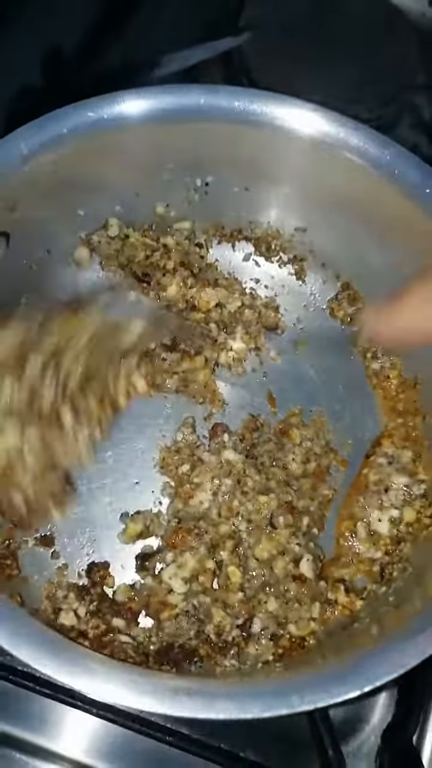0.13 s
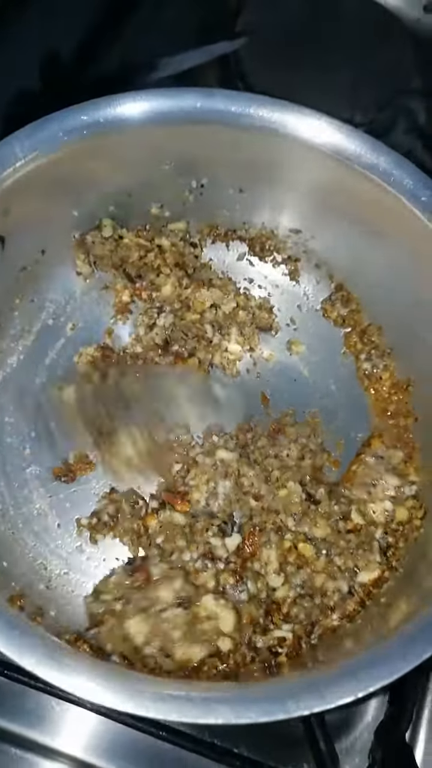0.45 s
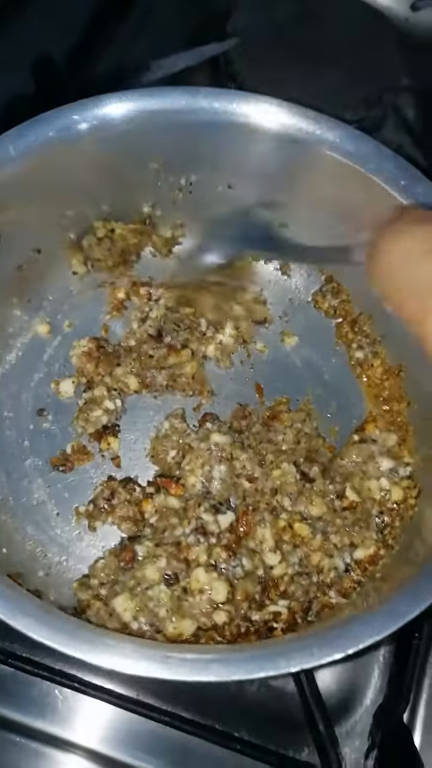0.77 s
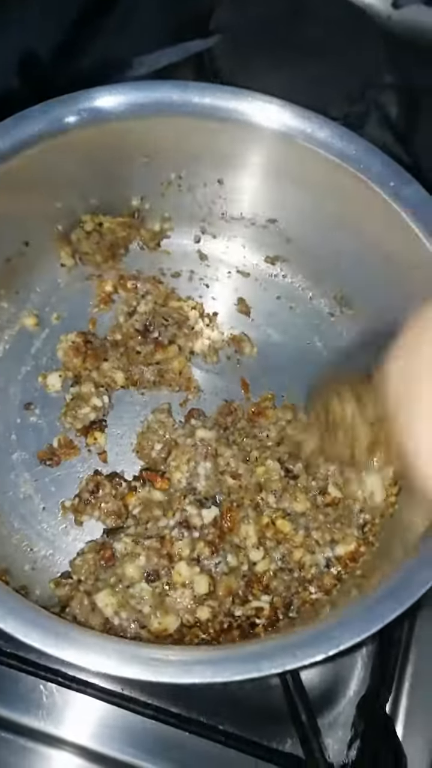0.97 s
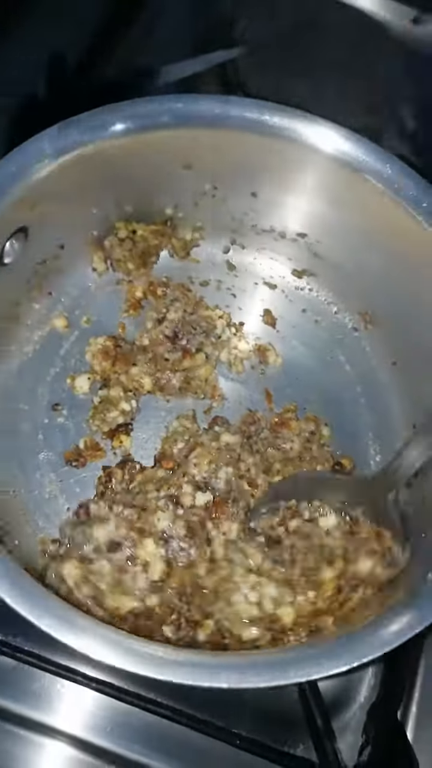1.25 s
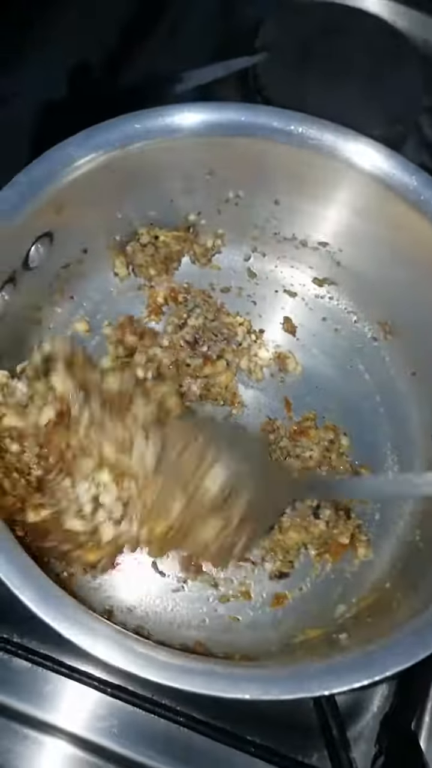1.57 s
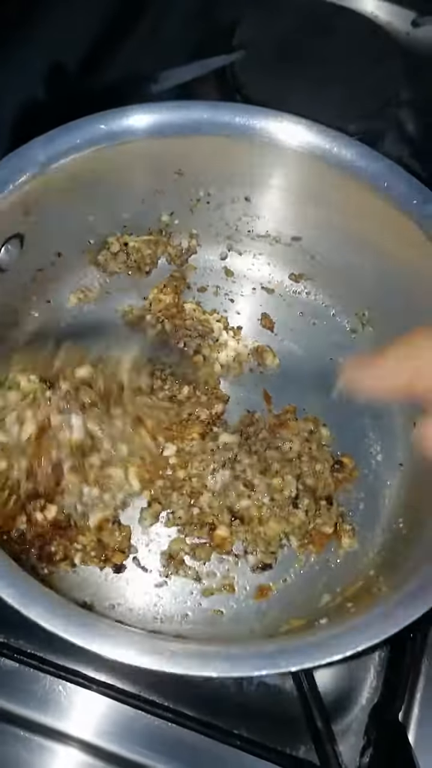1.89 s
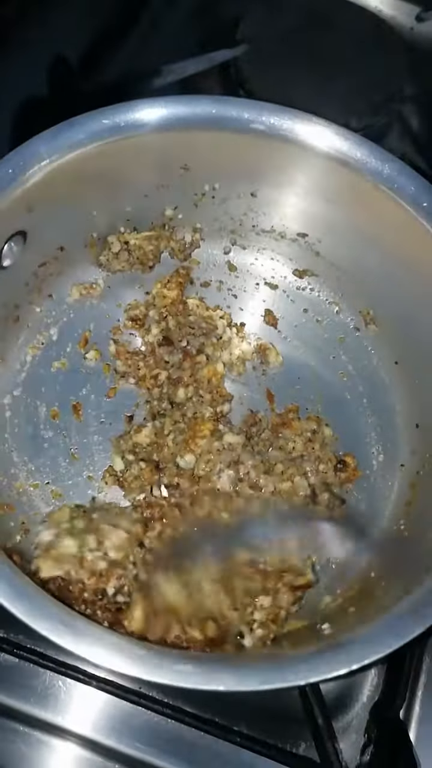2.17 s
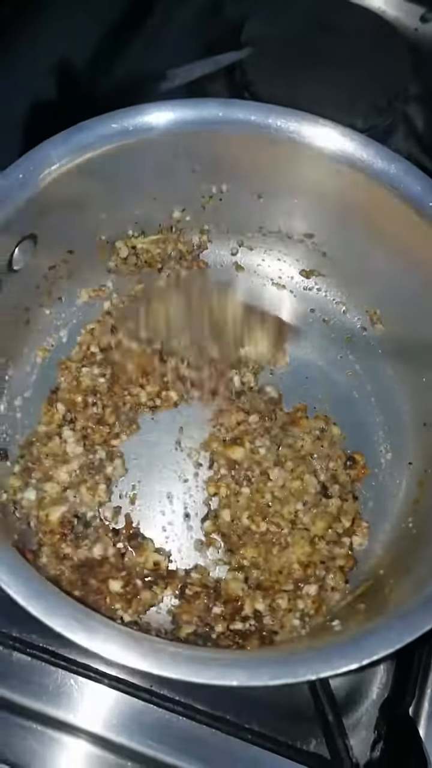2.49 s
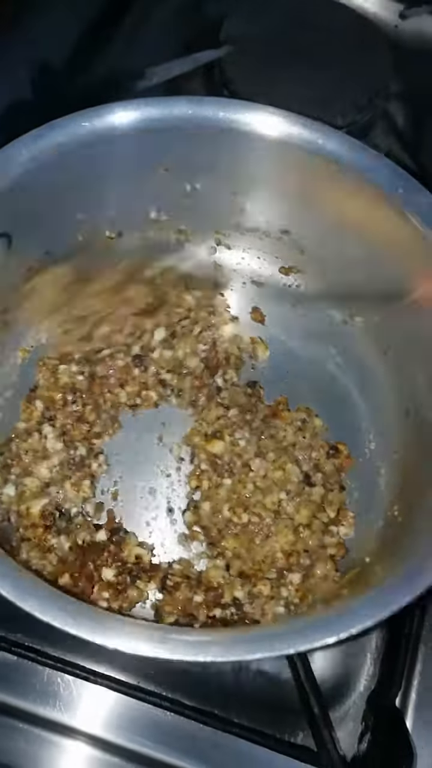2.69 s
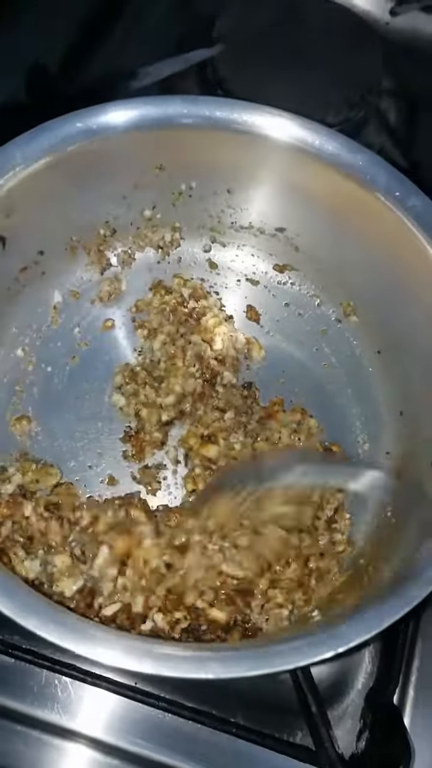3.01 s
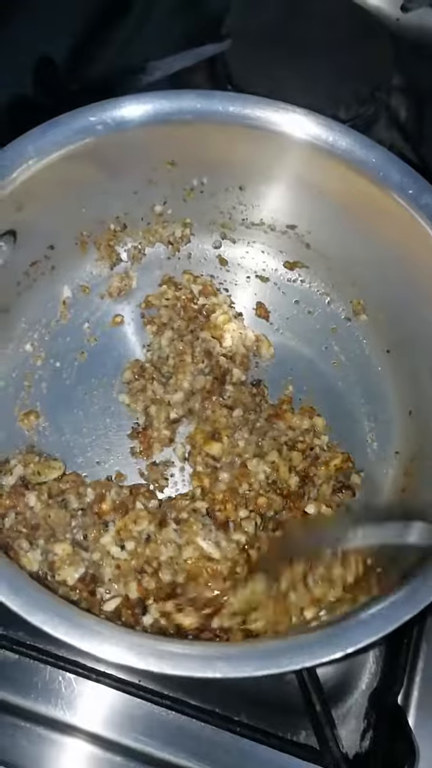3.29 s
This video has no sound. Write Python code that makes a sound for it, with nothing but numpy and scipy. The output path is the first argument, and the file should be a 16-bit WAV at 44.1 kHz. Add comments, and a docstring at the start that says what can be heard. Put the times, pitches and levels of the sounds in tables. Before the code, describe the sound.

Steel spoon stirring gritty food in a metal pan, sharp knocks and short squeaky scrapes, close up

```python
"""A steel spoon stirs crumbly food in a steel pan on a gas stove, close to two microphones.
Strokes: stick-slip partials squeak, filtered grit grates and excites pan modes; one ends in a bright rasp.
Knocks: ticks and noise cracks, ringing modes, grainy rattle, low shudder of the stand.
Burner: coloured noise hisses and rumbles, a narrow noise band hums. One low-passed gust touches the microphones."""
import sys
import numpy as np
from scipy import signal
from scipy.fft import rfft, irfft
from scipy.io import wavfile
from scipy.ndimage import uniform_filter1d

SR = 44100
rng = np.random.default_rng(int(sys.argv[2]) if len(sys.argv) > 2 else 0)


def dump(signal):
    """Clip the signal to [-1, 1] and save it as 16-bit WAV at the path in sys.argv[1]."""
    limited = np.clip(np.atleast_2d(signal).T, -1, 1)
    pcm = np.round(limited * 32767).astype(np.int16)
    wavfile.write(sys.argv[1], SR, pcm)


N = 152145
T = np.arange(N) / SR
F = np.fft.rfftfreq(N, 1 / SR) + 1  # offset 1 Hz keeps log(F) finite


def undb(db):
    """Decibels to gain."""
    return 10 ** (np.asarray(db) / 20)


def unit(x):
    """Scale to rms 1."""
    return x / np.sqrt(np.mean(x ** 2))


def colour(x, table):
    """Filter by (f/Hz, level/dB) points, interpolated over log f."""
    hz, db = np.array(table, float).T
    gain = undb(np.interp(np.log(F), np.log(hz), db))
    return irfft(rfft(x) * gain, N)


def band(x, hz, width_hz):
    """Two-pole resonance, gain 1 at the centre."""
    return signal.lfilter(*signal.iirpeak(hz, hz / width_hz, SR), x)


def band_twice(x, hz):
    """Two cascaded resonances, each as wide as its centre frequency."""
    return band(band(x, hz, hz), hz, hz)


def swell(start_s, rise_s, t60_s):
    """Exponential rise (time constant rise_s) times exponential fall."""
    t = np.maximum(T - start_s, 0)
    return (1 - np.exp(-t / rise_s)) * np.exp(-np.log(1000) * t / t60_s)


def grains(per_s, scatter_db):
    """Random clicks of uneven size, rms 1."""
    hits = rng.random(N) < per_s / SR
    sizes = rng.standard_normal(N) * undb(scatter_db * rng.exponential(size=N))
    return unit(hits * sizes)


def apart(draw):
    """Left and right share part of a random sound."""
    both, left, right = draw(), draw(), draw()
    return (both + 1.78 * np.array([left, right])) / np.sqrt(1.5)


def walk(per_s):
    """Random wander: noise averaged twice over 1 / per_s, rms 1."""
    k = int(SR / per_s)
    return unit(uniform_filter1d(uniform_filter1d(rng.standard_normal(N), k), k))


def ring(x, hz, t60_s):
    """One decaying pan mode; an impulse of 1 rings with amplitude 1."""
    pole = np.exp(2j * np.pi * hz / SR - np.log(1000) / (t60_s * SR))
    return signal.lfilter([1], [1, -pole], x).imag


def panned(x, left_minus_right_db):
    """Spread over left and right."""
    return x * undb(np.array([[left_minus_right_db], [-left_minus_right_db]]) / 2)


GRIT_PER_S, GRIT_SCATTER_DB = 6000, 1.5


def grit():
    """Dense random grains, partly shared by left and right."""
    return apart(lambda: grains(GRIT_PER_S, GRIT_SCATTER_DB))


GRIP_S, LIFT_T60_S = .002, .06  # force: rise time constant, release
SLIP_JITTER, OVERTONE_FLICKER_DB, SMEAR_PER_S = .015, 2.5, 350
ROUGH, FIRM_DB, ROUGH_PER_DB = .12, -37, .05  # squeaks below FIRM_DB are rougher
SQUEAK_PAN_DB, GRATE_FLICKER_DB = 11.5, 2
SINGS_FROM_HZ, SINGS_BELOW_HZ, SING_FLICKER_DB, GRIT_T60_S = 1500, 4700, 6.6, .022
# spoon strokes: t/s, length/s, squeak level/dB, start f/Hz, end f/Hz, overtones/dB re squeak,
# grating level/dB, pan singing level/dB, swell over the stroke/dB
STROKES = [(0, 0.13, -58, 736, 873, -16, -52.5, -55, -13.5),
           (0.075, 0.017, -33.5, 852, 845, -6.5, -51.5, -56, -9.5),
           (0.631, .038, -44, 1210, 1158, 8, -47, -45, 7),
           (0.706, 0.072, -37, 962, 727.4, 6, -42.5, -41.5, -1),
           (0.814, 0.033, -41, 758, 700, 4, -42, -58, -5),
           (0.862, 0.056, -43, 609, 625, -5, -43.5, -58, -7.5),
           (0.917, 0.03, -41, 762, 817, -5, -54.5, -53, 0.5),
           (0.955, 0.024, -40.5, 766, 723, -12, -48, -72, 0),
           (1.074, 0.062, -54, 738, 800, -16, -66, -66, 10),
           (1.211, 0.039, -55, 771, 820, -6, -62, -66.5, 16),
           (1.275, .11, -57.5, 830, 1040, -12, -63, -62, -5),
           (2.193, 0.019, -34, 902, 870, -8, -44, -49, 4.5),
           (2.216, 0.056, -36, 789, 809, -3.5, -39.5, -41.5, -6),
           (2.281, .035, -38.5, 908, 907, 9, -37, -41.5, -0.5),
           (2.601, .11, -39, 945, 863, -9, -40, -45.5, 3),
           (3.24, 0.075, -41.5, 846, 880, -13, -44.5, -49, -2),
           (3.297, .058, -41.5, 900.4, 965, 7.5, -40, -45, 1.5)]
# squeak partial colour: f/Hz, level/dB
SQUEAK_COLOUR = [(1200, 5), (1520, -8.5), (1950, -16), (2800, -16)]
# grating colour: f/Hz, level/dB
GRATING_COLOUR = [(710, 17.5), (1200, 6.5), (1870, 4), (3870, 1.5), (5180, 1), (7910, 2.5), (14800, -20.5)]
# pan modes, also rung by knocks: f/Hz, level/dB, t60/s
PAN_MODES = [(590, -10, .2), (717, 0, .08), (930, 0, .07), (1180, -7, .08), (1960, -3, .3), (2130, -4, .06),
             (2400, -3, .08), (3354, -8, .4), (3800, -2, .06), (4360, -4, .45), (5256, -1, .18),
             (5830, -6, .06), (6590, -4, .13), (7375, -4, .1), (8150, -3, .12), (9560, -8, .1)]


def strokes():
    """Stick-slip squeak of the spoon edge, partly smeared, and grit that grates and rings the pan."""
    wobble = 1 + SLIP_JITTER * walk(160)
    flickers = [undb(OVERTONE_FLICKER_DB * walk(26) * (k > 0)) for k in range(3)]
    smears = [walk(SMEAR_PER_S) for _ in range(3)]
    squeak, push, sing = np.zeros((3, N))
    colour_hz, colour_db = np.array(SQUEAK_COLOUR).T
    for s, length, db, from_hz, to_hz, over_db, grate_db, sing_db, swell_db in STROKES:
        part = slice(int(s * SR), min(int((s + length + .15) * SR), N))
        t = T[part] - s
        along = np.clip(t / length, 0, 1)
        lift_db = -60 * np.maximum(t - length, 0) / LIFT_T60_S
        force = (1 - np.exp(-t / GRIP_S)) * undb(swell_db * (along - .5) + lift_db)
        hz = (from_hz + (to_hz - from_hz) * np.sqrt(along)) * wobble[part]
        phase = 2 * np.pi * np.cumsum(hz) / SR
        rough = np.clip(ROUGH + ROUGH_PER_DB * max(FIRM_DB - db, 0), 0, 1)
        for k, (flicker, smear) in enumerate(zip(flickers, smears)):
            partial_db = db + over_db * (k > 0) + np.interp((k + 1) * hz, colour_hz, colour_db)
            steadiness = np.sqrt(1 - rough) + np.sqrt(rough) * smear[part]
            partial = np.sqrt(2) * np.sin((k + 1) * phase)
            squeak[part] += force * undb(partial_db) * flicker[part] * steadiness * partial
        push[part] += undb(grate_db) * force
        sing[part] += undb(sing_db) * force
    grains_lr = grit()
    modes = 0
    for hz, db, _ in PAN_MODES:
        if SINGS_FROM_HZ < hz < SINGS_BELOW_HZ:
            modes = modes + undb(db + SING_FLICKER_DB * walk(67)) * unit(ring(grains_lr, hz, GRIT_T60_S))
    grate = unit(colour(grains_lr, [(600, -66), *GRATING_COLOUR]))
    grating = undb(GRATE_FLICKER_DB * walk(46)) * push * grate
    return panned(squeak, SQUEAK_PAN_DB) + grating + sing * unit(modes)


BURNER_DB, RUMBLE_FLICKER_DB, FLICKER_DB, ALIKE_BELOW_HZ = -51, 3, .6, 290
HUM_HZ, HUM_DB, HUM_WIDTH_HZ = 281.2, -62, 3.3
# burner noise colour: f/Hz, level/dB
BURNER_COLOUR = [(27, -2), (54, -1), (151, -6), (293, -12), (665, -22), (1040, -12.5), (1480, -23),
                 (2000, -15), (2300, -26.5), (4400, -24.5), (6000, -29), (8000, -21.5), (10000, -29.5),
                 (14400, -33.5), (16000, -55)]
# edges of the separately flickering bands: f/Hz
FLICKER_EDGES_HZ = [0, 60, 500, 3000, 22050]


def burner():
    """Gas hiss over a fluttering rumble, alike left and right only in the bass, and a faint wavering hum."""
    mid, side = (rfft(colour(rng.standard_normal(N), BURNER_COLOUR)) for _ in range(2))
    wide = 1 / (1 + (ALIKE_BELOW_HZ / F) ** 2)
    pair = np.array([mid + wide * side, mid - wide * side]) / np.sqrt(1 + wide ** 2)
    flickers = [(RUMBLE_FLICKER_DB, 6), (RUMBLE_FLICKER_DB, 12), (FLICKER_DB, 20), (FLICKER_DB, 25)]  # dB, 1/s
    gas = 0
    for lo, hi, (db, per_s) in zip(FLICKER_EDGES_HZ, FLICKER_EDGES_HZ[1:], flickers):
        gas = gas + undb(db * walk(per_s)) * irfft(pair * ((F >= lo) & (F < hi)), N)
    hum = unit(band(rng.standard_normal(N), HUM_HZ, HUM_WIDTH_HZ))
    return undb(BURNER_DB) * unit(gas) + undb(HUM_DB) * hum


CRACK_RISE_S, CRACK_T60_S, TICK_DB = 0.001, 0.02, -3
THUD_RISE_S, THUD_T60_S, THUD_DB = 0.018, 0.32, 3
RATTLE_PER_S, RATTLE_SCATTER_DB, RATTLE_TILT_DB_PER_OCTAVE = 3000, 1.5, -5
RATTLE_RISE_S, RATTLE_T60_S = .002, 0.29
CLANK_DB, CLANK_T60_S = 19, .036  # louder first moments of the modes
RING_SCATTER_DB, CONTACT_S, RING_BEAT = 2.5, .003, .9  # modes join in over the contact
# knocks: t/s, level/dB, then re level/dB: thud, low, middle, treble, rattle, ring
KNOCKS = [(0.161, -14.5, -16, -2.5, -1.5, -10.5, -15.5, -28.5),
          (0.526, -39.5, -2, 3.5, -45, -20, -10, -11.5), (0.642, -20.5, -22.5, -6, -49, -35, -13.5, -48),
          (0.786, -8, -26.5, -7, -8.5, -5, -19, -35.5), (0.799, -15.5, -28.5, -8, 1, -0.5, -21, -30),
          (1.7198, -13.5, -26.5, 5, -6, -34, -18.5, -37), (1.757, -27.5, -9, -18, -11, -14.5, -8, -20.5),
          (1.902, -11, -19.5, -7, -8, -11.5, -18, -28), (2.559, -9, -28, 3, -6.5, -7.5, -20, -32.5),
          (2.611, -22.5, -17.5, 0.5, -42, -5, -13, -32), (2.722, -19, -15, -12, 2.5, -3, -11, -27.5),
          (3.0365, -8, -32, -30, -6.5, -2.5, -27, -28), (3.19, -26.5, -16.5, -1, 2.5, 1, -17, -33.5)]
# centres of low, middle, treble: f/Hz
BANDS_HZ = [904, 2087, 6400]
# stand shudder colour: f/Hz, level/dB
THUD_COLOUR = [(40, -10), (146, 1.5), (281, 0.5), (600, -21), (900, -106)]


def knocks():
    """Each blow: a tick and short crack, ringing modes, a grainy rattle; the stand's shudder apart."""
    noise = rng.standard_normal(N)
    rattle = apart(lambda: grains(RATTLE_PER_S, RATTLE_SCATTER_DB))
    cracks = [unit(band_twice(noise, f)) for f in BANDS_HZ]
    tilts_db = [RATTLE_TILT_DB_PER_OCTAVE * np.log2(f / BANDS_HZ[0]) for f in BANDS_HZ]
    tails = sum(unit(band_twice(rattle, f)) * undb(d) for f, d in zip(BANDS_HZ, tilts_db))
    thud = unit(colour(rng.standard_normal(N), THUD_COLOUR))
    modes = np.arange(len(PAN_MODES))
    log_mode_hz = np.log(np.array(PAN_MODES)[:, 0])
    out, shudder = np.zeros((2, N)), np.zeros(N)
    blows, ticks = np.zeros((len(PAN_MODES), N)), np.zeros((len(BANDS_HZ), N))
    for s, db, thud_db, *tone, rattle_db, ring_db in KNOCKS:
        crack = sum(undb(db + d) * c for d, c in zip(tone, cracks))
        out += crack * swell(s, CRACK_RISE_S, CRACK_T60_S)
        out += undb(db + rattle_db) * tails * swell(s, RATTLE_RISE_S, RATTLE_T60_S)
        shudder += undb(db + thud_db + THUD_DB) * thud * swell(s, THUD_RISE_S, THUD_T60_S)
        scatter_db = RING_SCATTER_DB * rng.standard_normal(len(modes))
        late_s = CONTACT_S * rng.random(len(modes))
        tone_db = np.interp(log_mode_hz, np.log(BANDS_HZ), tone)
        blows[modes, ((s + late_s) * SR).astype(int)] = undb(db + ring_db + scatter_db + tone_db)
        ticks[:, int(s * SR)] = undb(db + TICK_DB + np.array(tone))
    out += sum(band_twice(x, f) * SR / f / 2 for x, f in zip(ticks, BANDS_HZ))  # offsets 1/bandwidth
    for blow, (hz, db, t60_s) in zip(blows, PAN_MODES):
        beat = 1 + RING_BEAT * np.array([walk(77), walk(180)])
        clank = undb(CLANK_DB) * ring(blow, hz, CLANK_T60_S)
        out += undb(db) * (ring(blow, hz, t60_s) * beat + clank)
    return out, shudder


RASP_S, RASP_DB, RASP_RISE_S, RASP_T60_S, RASP_HZ = 0.93, -35, .015, .12, 6330


def rasp():
    """A brief bright rasp of band-passed grit as one stroke ends."""
    half = RASP_HZ / 2
    bright = unit(band(band(grit(), RASP_HZ, half), RASP_HZ, half))
    return undb(RASP_DB) * bright * swell(RASP_S, RASP_RISE_S, RASP_T60_S)


PUFF_S, PUFF_DB, PUFF_RISE_S, PUFF_T60_S, PUFF_HZ = 1.462, -32.5, 0.014, 0.84, 60


def puff():
    """A low gust on the microphones: band-passed noise, quick rise, slow fall."""
    sos = signal.butter(2, [15, PUFF_HZ], "bandpass", fs=SR, output="sos")
    air = signal.sosfilt(sos, rng.standard_normal(N))
    return undb(PUFF_DB) * unit(air) * swell(PUFF_S, PUFF_RISE_S, PUFF_T60_S)


LEFT_LAG_S, ROOM_DB, ROOM_T60_S = 0.000504, -9.5, .22
# treble fall-off of the pan: f/Hz, level/dB
AIR_COLOUR = [(9000, 0), (12000, -6.5), (16000, -11)]


def scene():
    """The pan reaches the left microphone a little late; the kitchen answers differently on each side."""
    blows, shudder = knocks()
    pan = colour(blows + strokes() + rasp(), AIR_COLOUR)
    left = irfft(rfft(pan[0]) * np.exp(-2j * np.pi * F * LEFT_LAG_S), N)
    near = np.array([left, pan[1]]) + shudder
    echo = rng.standard_normal((2, SR // 2)) * swell(0.0019, 0.011, ROOM_T60_S)[:SR // 2]
    echo /= np.sqrt(np.sum(echo ** 2, axis=1, keepdims=True))
    room = signal.fftconvolve(pan, echo, axes=1)[:, :N]
    return near + undb(ROOM_DB) * room + burner() + puff()


TOP_HZ = 15900
# microphone colour difference: f/Hz, left re right level/dB
PORTS = [(350, 0.5), (700, -1.5), (1290, -2.5), (2380, -4.5), (8120, -10), (15000, 5.5)]


def record(dry):
    """The two microphones differ in colour; the top is cut."""
    pair = [colour(x, [(hz, side * db / 2) for hz, db in PORTS]) for x, side in zip(dry, (1, -1))]
    return signal.sosfilt(signal.ellip(8, .2, 70, TOP_HZ, fs=SR, output="sos"), pair)


dry = scene()
out = record(dry)
dump(out)
```